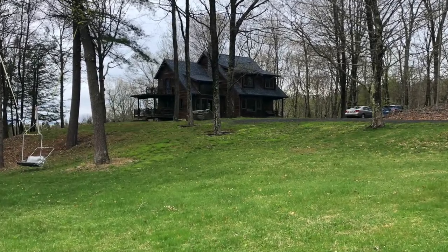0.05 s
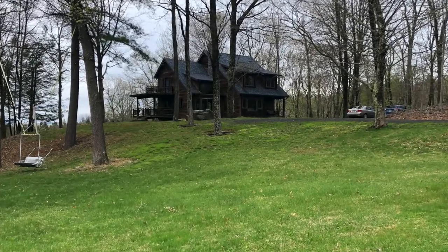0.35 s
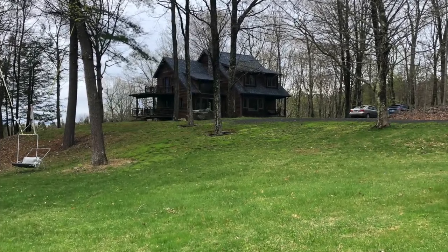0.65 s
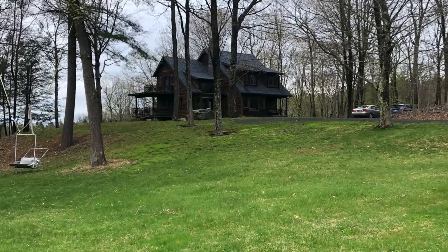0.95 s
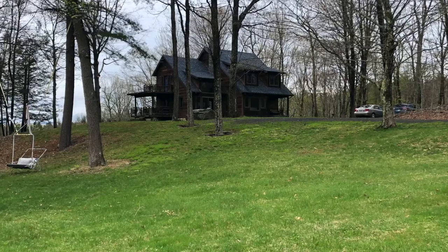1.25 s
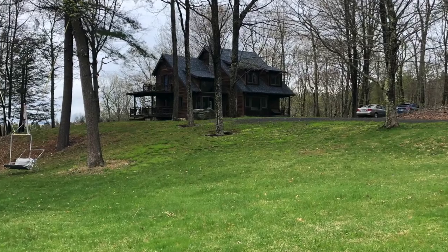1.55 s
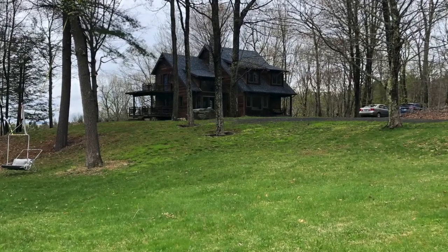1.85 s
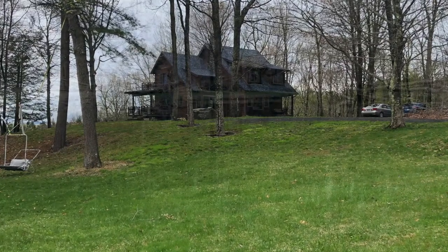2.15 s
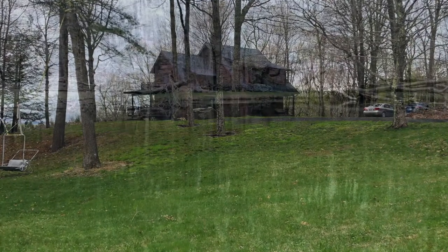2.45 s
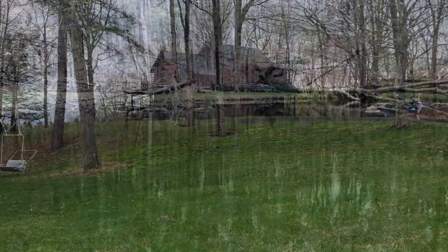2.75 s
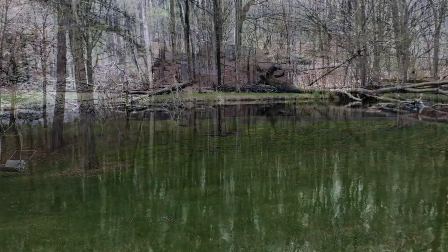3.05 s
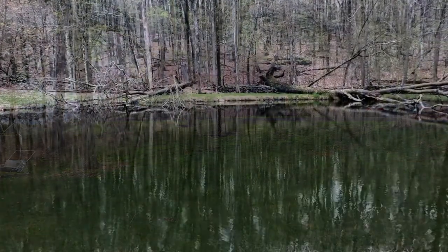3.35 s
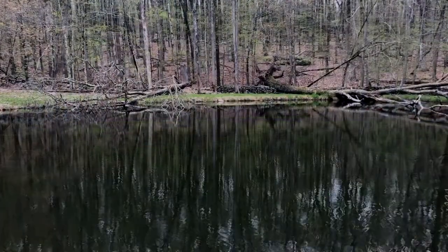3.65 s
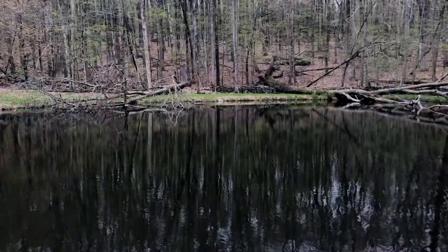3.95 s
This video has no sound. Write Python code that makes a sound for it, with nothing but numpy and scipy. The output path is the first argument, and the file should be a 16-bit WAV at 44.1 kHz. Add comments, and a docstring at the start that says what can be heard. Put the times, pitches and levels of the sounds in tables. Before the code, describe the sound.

A chorus of trilling toads, first farther off, then close at a woodland pond.

```python
"""Toads trill in a spring wood, first heard across a lawn. Each pulses a short whistle about 30 times
a second at its own pitch and pace, so the trills drift in and out of step, echoed by the trees.
Soft air, farther toads, low blips and tiny ticks in the leaves lie behind. From about 2 s a slow
dissolve brings us to the edge of the toads' pond. A distant rumble swells and recedes, and a fine
treble hiss comes in at about 2.5 s. In the last second a few frogs peep far off."""
import sys
import numpy as np
from scipy import signal
from scipy.fft import rfft, irfft
from scipy.io import wavfile
from scipy.ndimage import uniform_filter1d

SR = 44100
rng = np.random.default_rng(int(sys.argv[2]) if len(sys.argv) > 2 else 0)


def store_wav(level_fs):
    """Save 16-bit WAV to argv[1]."""
    pcm = np.round(np.clip(np.atleast_2d(level_fs), -1, 1) * 32767)
    wavfile.write(sys.argv[1], SR, pcm.T.astype(np.int16))


N = 176400

# air bed tone curves: frequency_hz, relative_level_db
LAWN_AIR_CURVE = [(25, -19.5), (50, -11), (90, -0.5), (135, 2.5), (220, -11.5), (400, -10), (750, -14.5),
                  (1050, -10.5), (1350, -6), (2100, -17), (3300, -20), (4000, -26), (5000, -25.5),
                  (6500, -29.5), (10000, -34), (15500, -38)]
POND_AIR_CURVE = [(25, -25.5), (55, 0.5), (90, -0.5), (220, 4), (420, -9.5), (800, -11.5), (1300, -5.5),
                  (2200, -12.5), (3300, -14.5), (4100, -19.5), (4800, -20), (6200, -27.5), (10000, -33),
                  (15500, -40)]
# foreground toads, the last three levels relative to level_db:
# place, pitch_hz, level_db, pulse_s, second_harmonic_db, third_harmonic_db, rasp_hz, rasp_db
NEAR_TOADS = [ ("lawn", 1555, -41, 0.017, -36.5, -41, 420, -42),
              ("lawn", 1688, -38, 0.022, -39, -40, 992, -27),
              ("lawn", 1768, -44, 0.028, -34.5, -46.5, 930, -36),
              ("pond", 1472, -26.5, 0.021, -35.5, -28, 748, -25),
              ("pond", 1692, -32.5, .019, -31, -43.5, 590, -36),
              ("pond", 1847.5, -28.5, .018, -27.5, -42, 800, -36),
              ("pond", 1593, -36, 0.02, -30.5, -33, 770, -31.5),
              ("pond", 1760, -37.5, 0.023, -29, -43.5, 660, -28.5), ]
# each near toad's rhythm: anchor_pulse_s, then pulse_rate_hz at its place's four keyframes
TOAD_RHYTHMS = [ (.0248, 29.07, 29.33, 27.83, 27.92), (.0197, 31.9, 31.93, 31.13, 32.29),
                (.0237, 29.07, 30.57, 28.57, 30.02), (2.2098, 30.55, 30.07, 30.3, 29.61),
                (2.2293, 31.75, 31.14, 31.46, 30.73), (2.2044, 34.24, 32.26, 33.31, 35.27),
                (2.235, 25.57, 27.66, 25.58, 26.88), (2.2256, 28.59, 29.25, 28.01, 29.86), ]
# rhythm keyframes by place: time_s, four times
RHYTHM_KEYFRAMES = {"lawn": (0, .7, 1.4, 2.4), "pond": (2.2, 2.8, 3.4, 4)}
# background toads by place, before FAR_TRANSPOSE: lowest_hz, highest_hz, echo_send_db
FAR_CHORUS = {"lawn": (1450, 1700, -65), "pond": (1470, 1860, -46)}
# faint low blips: centre_s, pitch_hz, level_db
LOW_BLIPS = [(.09, 570, -69), (.185, 620, -63.5), (.805, 640, -65.5), (1.45, 635, -64.5), (1.897, 610, -70),
             (2.19, 590, -63), (2.32, 586, -65), (3.2, 833, -51)]
# ticks in the leaves: start_s, level_db, pitch_hz
LEAF_TICKS = [(.287, -66.5, 5700), (.351, -73, 6330), (.628, -70, 6610), (.813, -72, 6880),
              (0.885, -67, 5750), (.953, -72, 5600), (1.073, -70, 5750), (1.266, -70, 5500),
              (1.466, -72, 5520), (1.686, -64, 5600), (1.717, -71, 5620), (1.905, -69, 7230),
              (1.979, -67.5, 5500), (2.1, -67.5, 5300)]
# fader rides for the rumble and the hiss: time_s, level_db
RUMBLE_FADER = [(2, -80), (2.55, -60.5), (3, -59.5), (3.45, -52.5), (3.75, -62.5), (4, -82)]
HISS_FADER = [(2.2, -105), (2.52, -84), (2.67, -77), (3.05, -76), (3.5, -77.5), (4, -79.5)]
# frog peeps: start_s, length_s, start_pitch_hz, end_pitch_hz, level_db
FROG_PEEPS = [(3.02, 0.105, 2400, 2583, -60.5), (3.291, 0.18, 2238, 2642, -58.5),
              (3.518, 0.15, 2585, 2557, -64.5), (3.631, .19, 2220, 2630, -59.5),
              (3.9, 0.095, 2570, 2604, -65.5)]

TIME_S = np.arange(N) / SR
DISSOLVE_S = (2.02, 3.82)
SAG_HZ = {"lawn": 29.4, "pond": 45.6}  # pitch drop across one pulse
PITCH_SCATTER, PITCH_DRIFT = .0035, .005  # fractions of the pitch
PULSE_JITTER_S, PULSE_SCATTER_DB = .00008, .7
FAR_RATE_HZ, FAR_PULSE_S, FAR_TRANSPOSE = 31, .018, .908
ECHO_T60_S, NEAR_SEND_DB = 0.72, {"lawn": -9, "pond": -9.5}


def undb(db):
    """Decibels to gain."""
    return 10 ** (np.asarray(db) / 20)


def unit(x):
    """Scale to rms 1."""
    return x / np.sqrt(np.mean(x ** 2))


def wander(rate_hz):
    """Smooth random modulation of rms 1."""
    hold = int(SR / rate_hz)
    steps = np.repeat(rng.standard_normal(N // hold + 1), hold)
    return unit(uniform_filter1d(uniform_filter1d(steps, hold), hold)[:N])


def noise(colour):
    """Noise of rms 1, shaped by the gain curve colour(hz)."""
    hz = np.maximum(np.arange(N // 2 + 1) * SR / N, 1)
    return unit(irfft(rfft(rng.standard_normal(N)) * colour(hz), N))


def band(hz, width_hz):
    """Noise in a steep resonance."""
    return noise(lambda f: 1 / (1 + ((f * f - hz * hz) / (f * width_hz * 2)) ** 2))


def swell(progress, attack, release):
    """Rounded envelope over progress 0..1; attack and release are shares of its length."""
    fade_in = np.sin(np.pi / 2 * np.clip(progress / attack, 0, 1)) ** 2
    fade_out = np.sin(np.pi / 2 * np.clip((1 - progress) / release, 0, 1)) ** 2
    return fade_in * fade_out


def air(curve, level_db):
    """A soft bed of outdoor noise, slightly restless in level."""
    hz, gain_db = np.array(curve).T
    bed = noise(lambda f: undb(np.interp(np.log(f), np.log(hz), gain_db)))
    return bed * undb(level_db + .5 * wander(12))


def toad_trill(rate_hz, anchor_s, hz, pulse_s, sag_hz, partials):
    """One toad's whistle and envelope: each pulse starts the vocal sac afresh, swells, sags and dies."""
    cycles = np.cumsum(rate_hz) / SR
    cycles -= np.interp(anchor_s, TIME_S, cycles)  # centre a pulse on the anchor
    pulse = np.round(cycles).astype(int)
    late, loud, sharp = rng.standard_normal((256, 3))[pulse % 256].T  # each pulse varies a little
    from_centre_s = (cycles - pulse) / rate_hz + PULSE_JITTER_S * late
    pitch_hz = hz * (1 + PITCH_SCATTER * sharp + PITCH_DRIFT * wander(3.99))
    phase = 2 * np.pi * (pitch_hz * from_centre_s - sag_hz * from_centre_s ** 2 / (2 * pulse_s))
    envelope = swell(from_centre_s / pulse_s + .5, attack=.36, release=.69)
    # overtones show most at the top of each pulse
    whistle = sum(undb(db) * envelope ** np.sqrt(ratio) * np.sin(ratio * phase) for ratio, db in partials)
    return undb(PULSE_SCATTER_DB * loud) * whistle, envelope


def tree_echo(sound):
    """Countless trunks scatter the sound into a dense, dying tail."""
    t = np.arange(SR) / SR
    build_up = 1 - np.exp(-t / 0.0068)
    tail = rng.standard_normal(SR) * np.exp(-np.log(1000) * t / ECHO_T60_S) * build_up
    tail /= np.sqrt(np.sum(tail ** 2))
    pre_roll = sound[:SR][::-1]  # the wood is already ringing at the start
    return signal.fftconvolve(np.concatenate([pre_roll, sound]), tail)[SR:SR + N]


def toad_chorus(place):
    """Near toads with a raspy undertone up front, six far ones behind with more echo."""
    near, far = np.zeros(N), np.zeros(N)
    for toad, (anchor_s, *rates_hz) in zip(NEAR_TOADS, TOAD_RHYTHMS):
        home, hz, level_db, pulse_s, second_db, third_db, rasp_hz, rasp_db = toad
        if home == place:
            rate_hz = np.interp(TIME_S, RHYTHM_KEYFRAMES[place], rates_hz)
            partials = [(1, 0), (2, second_db), (3, third_db)]
            whistle, envelope = toad_trill(rate_hz, anchor_s, hz, pulse_s, SAG_HZ[place], partials)
            rasp = band(rasp_hz, width_hz=70) * undb(rasp_db + .8 * wander(20)) / np.sqrt(2)
            near += undb(level_db) * (whistle + envelope ** 2 * rasp)
    lowest_hz, highest_hz, send_db = FAR_CHORUS[place]
    partials = [(FAR_TRANSPOSE, 0.0079)]
    for hz in np.linspace(lowest_hz, highest_hz, 6):
        rate_hz = FAR_RATE_HZ * (1 + .07 * rng.uniform(-1, 1) + .01 * wander(2))
        whistle, _ = toad_trill(rate_hz, rng.random(), hz, FAR_PULSE_S, SAG_HZ[place], partials)
        far += undb(send_db) * whistle
    return near + far / 2 + tree_echo(undb(NEAR_SEND_DB[place]) * near + far)


def blips(length_s=.028):
    """Short, soft, hollow notes far off."""
    out = np.zeros(N)
    for centre_s, hz, level_db in LOW_BLIPS:
        t = TIME_S - centre_s
        envelope = swell(t / length_s + .5, attack=.28, release=.68)
        out += undb(level_db) * envelope * np.sin(2 * np.pi * hz * t)
    return out


def litter_crackle(clicks_per_s=7, level_db=-69, decay_s=.0007):
    """Sparse, very faint clicks of dry litter."""
    hits = (rng.random(N) < clicks_per_s / SR) * rng.uniform(.5, 1, N)
    envelope = signal.lfilter([1], [1, -np.exp(-1 / (decay_s * SR))], hits + 1e-18)
    return undb(level_db) * envelope * band(9000, width_hz=6000)


def leaf_ticks(decay_s=.0025):
    """Tiny dry ticks in the leaves, each a snap of bright noise."""
    out = np.zeros(N)
    for start_s, level_db, hz in LEAF_TICKS:
        envelope = (TIME_S >= start_s) * np.exp(-np.abs(TIME_S - start_s) / decay_s)
        out += undb(level_db) * envelope * band(hz, width_hz=1400)
    return out


def distant_rumble():
    """A low drone, perhaps a far road, swells and recedes."""
    level_db = np.interp(TIME_S, *np.array(RUMBLE_FADER).T)
    return band(240, width_hz=73) * undb(level_db)


def treble_hiss(flicker_db=2):
    """A fine, flickering treble hiss comes in at about 2.5 s and holds."""
    level_db = np.interp(TIME_S, *np.array(HISS_FADER).T, left=-200)
    return band(8500, width_hz=5200) * undb(level_db + flicker_db * wander(300))


def peeping_frogs(echo_send_db=1):
    """Small frogs far off: thin whistles, most sliding up before they level out."""
    peeps = np.zeros(N)
    for start_s, length_s, start_hz, end_hz, level_db in FROG_PEEPS:
        progress = np.clip((TIME_S - start_s) / length_s, 0, 1)
        hz = start_hz + (end_hz - start_hz) * np.sin(np.pi / 2 * progress)
        envelope = swell(progress, attack=.3, release=.15)
        peeps += undb(level_db) * envelope * np.sin(2 * np.pi * np.cumsum(hz) / SR)
    return peeps + undb(echo_send_db) * tree_echo(peeps)


def scene():
    """The lawn dissolves into the pond's edge; the small details sit outside the crossfade."""
    lawn = toad_chorus("lawn") + air(LAWN_AIR_CURVE, level_db=-64.5)
    pond = toad_chorus("pond") + air(POND_AIR_CURVE, level_db=-51.5) + peeping_frogs()
    details = distant_rumble() + leaf_ticks() + litter_crackle() + treble_hiss() + blips()
    crossfade = np.interp(TIME_S, DISSOLVE_S, (0, 1))
    return ((1 - crossfade) * lawn + crossfade * pond + details)[None]


def record(dry):
    """A steep low-pass trims the very top."""
    return signal.sosfilt(signal.ellip(10, .1, 80, 15700, fs=SR, output="sos"), dry)


dry = scene()
out = record(dry)
store_wav(out)
```